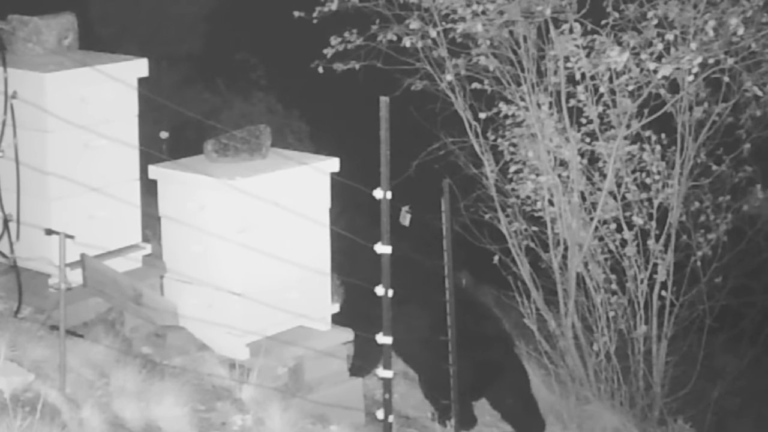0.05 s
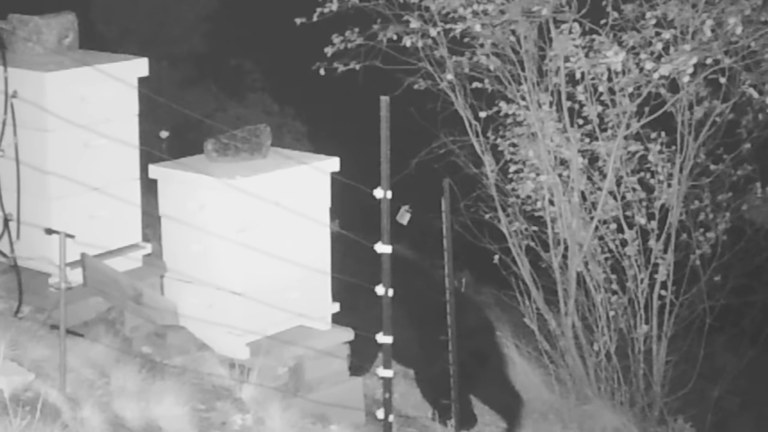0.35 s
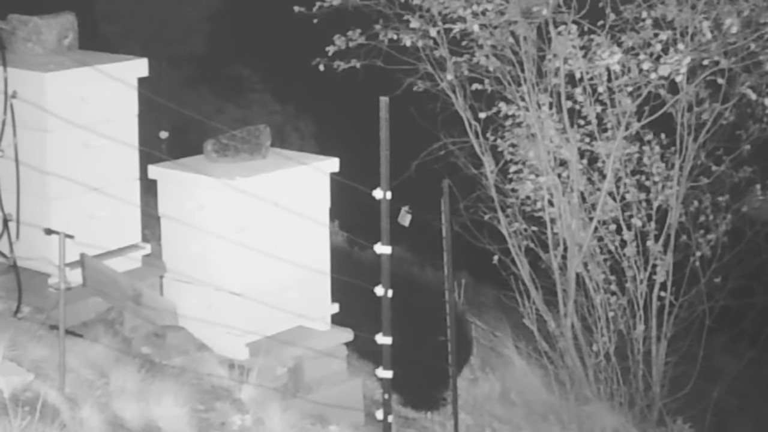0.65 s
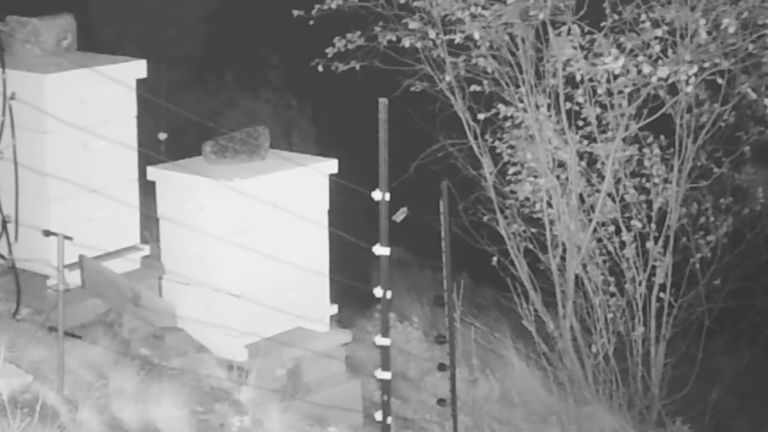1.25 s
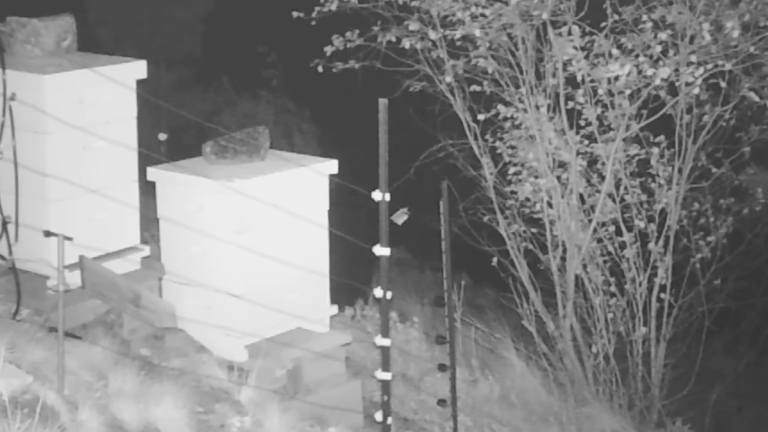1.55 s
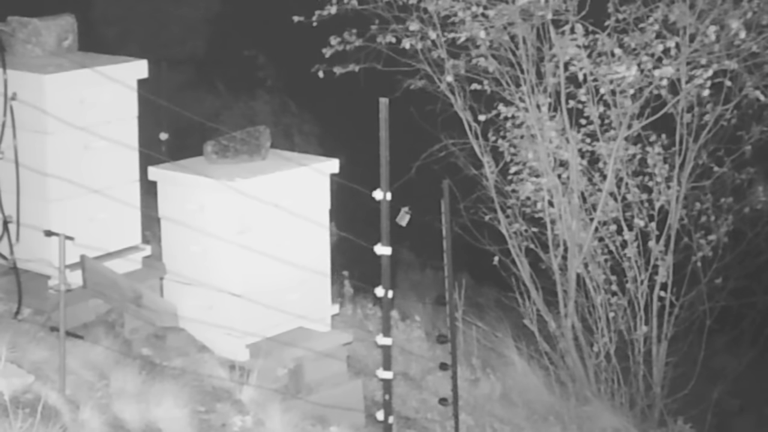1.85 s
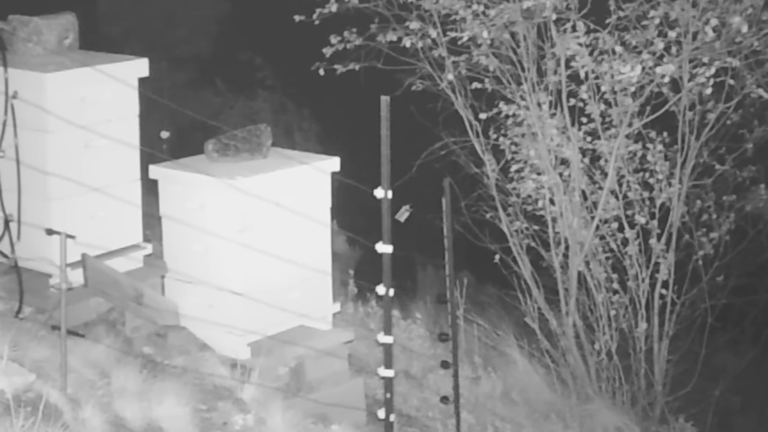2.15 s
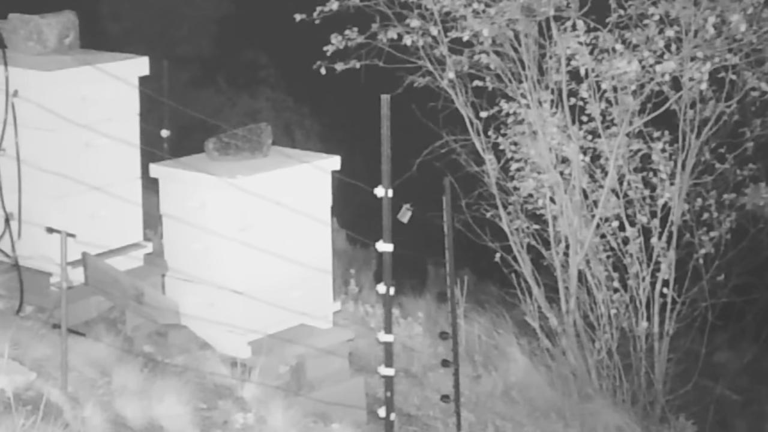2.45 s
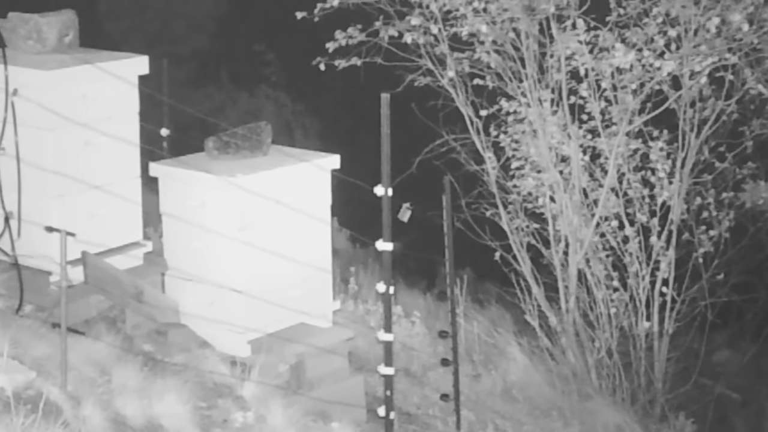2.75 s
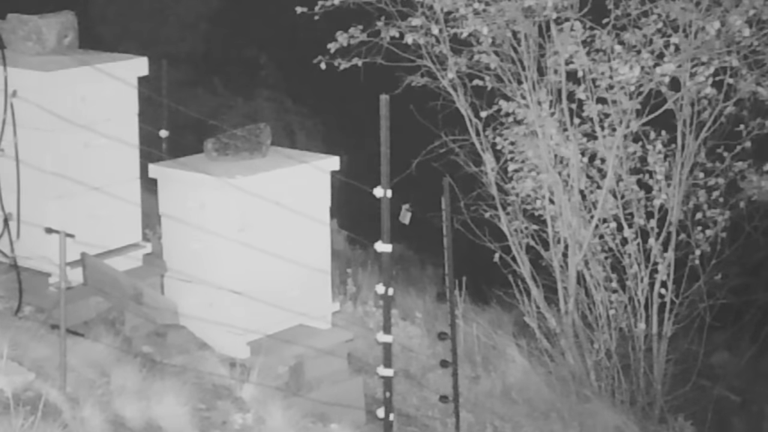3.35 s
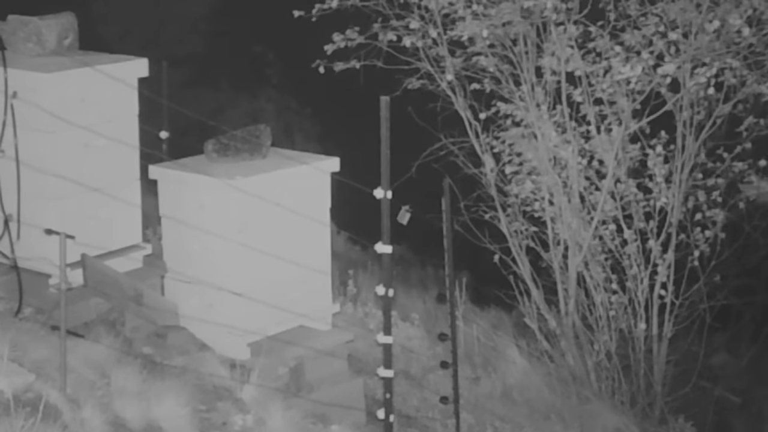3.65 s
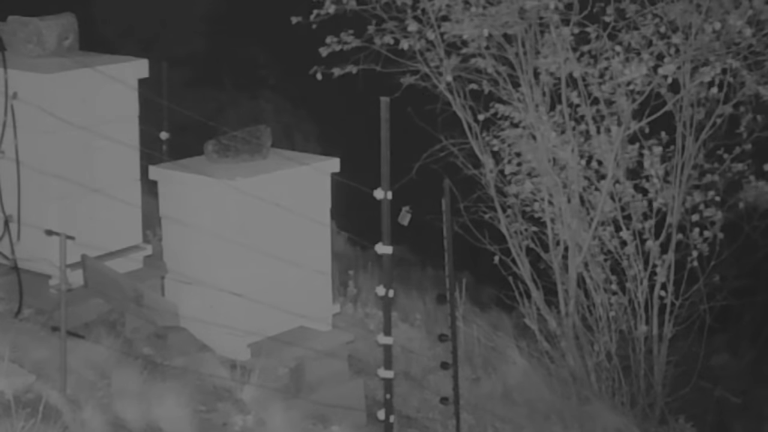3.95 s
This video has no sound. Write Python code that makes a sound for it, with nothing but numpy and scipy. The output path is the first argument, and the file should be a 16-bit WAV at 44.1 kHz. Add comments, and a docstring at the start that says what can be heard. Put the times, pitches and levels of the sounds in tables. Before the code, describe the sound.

Gusts of wind rumble and pop on the microphone outdoors, with faint rustling grass.

```python
"""Gusts of night wind rumble and pop on a microphone beside a wire fence and a bush.
The rumble comes from eddies, small swirls of air. A stronger gust reaches higher in pitch,
and the sharpest eddies pop on the microphone's opening. Behind the wind are a few twig ticks,
faint rustling grass, a steady rush of far air and the microphone's own hiss."""
import sys
import numpy as np
from scipy import signal
from scipy.fft import rfft, irfft, next_fast_len
from scipy.io import wavfile
from scipy.ndimage import uniform_filter1d, map_coordinates

SR = 44100
rng = np.random.default_rng(int(sys.argv[2]) if len(sys.argv) > 2 else 0)


def put_to_file(sound):
    """Save the sound as 16-bit audio at rate SR, in the file named by the first command-line argument."""
    columns = np.atleast_2d(sound).T  # one column per channel
    safe = np.clip(columns, -1, 1)
    whole_steps = np.round(safe * 32767)
    wavfile.write(sys.argv[1], SR, whole_steps.astype(np.int16))


N = 176400  # 4 seconds

# How strong the wind is at the microphone: time_s, level_db
GUST_STRENGTH = [(0.0, -62), (0.04, -57), (0.09, -39.5), (0.2, -60), (0.39, -62.5), (0.45, -42),
                 (0.63, -35.5), (0.76, -57), (0.78, -45), (0.87, -61.5), (0.95, -45), (1.05, -49),
                 (1.27, -42.5), (1.29, -53), (1.33, -43.5), (1.4, -61), (1.68, -59), (1.7, -46.5),
                 (1.79, -48), (1.98, -32.5), (2.04, -45), (2.06, -41.5), (2.08, -52.5), (2.11, -28.5),
                 (2.14, -44), (2.17, -31), (2.23, -46), (2.36, -39), (2.39, -49), (2.43, -42), (2.56, -52),
                 (2.7, -53), (2.74, -42), (2.87, -55), (3.04, -40.5), (3.13, -52), (3.24, -42), (3.25, -36),
                 (3.36, -36), (3.44, -67), (3.46, -43), (3.58, -64), (3.6, -44), (3.98, -40.5)]
# How strong the deep bass is: time_s, level_db
BASS_STRENGTH = [(0.0, -37), (0.11, -25.5), (0.25, -41), (0.5, -23.5), (0.89, -36), (0.93, -25.5),
                 (1.34, -29), (1.44, -47.5), (1.75, -30), (1.84, -31), (1.86, -24), (2.21, -25.5),
                 (2.24, -34), (2.26, -26), (2.36, -20), (2.39, -31), (2.53, -37.5), (2.74, -29),
                 (2.86, -35), (3.0, -26.5), (3.16, -36), (3.19, -28.5), (3.62, -27), (3.65, -33.5),
                 (3.96, -24.5), (3.98, -27)]
USUAL_GUST_DB, USUAL_BASS_DB = -42, -29.5  # the wind layers follow the distance from these levels


def wind_swell():
    """The largest eddies push slowly on the microphone and make the deepest bass."""
    # Tone of the large eddies: pitch_hz, level_db
    tone = [(8, -30), (16, 5.5), (30, 0.5), (58, -2.5), (85, -10.5), (130, -25), (300, -80.5)]
    bass_db = curve(BASS_STRENGTH) - USUAL_BASS_DB
    return gain(-27 + 1.05 * bass_db) * eddies(tone, even_s=0.1)


def wind_rumble():
    """Middle-sized eddies rumble, growing with both the gust and the deep bass."""
    # Tone of the middle-sized eddies: pitch_hz, level_db
    tone = [(40, -5.5), (75, 0.5), (105, 1.5), (185, -4.5), (260, -12.5), (400, -24.5), (800, -45),
            (2000, -96.5)]
    gust_db = curve(GUST_STRENGTH) - USUAL_GUST_DB
    bass_db = curve(BASS_STRENGTH) - USUAL_BASS_DB
    return gain(-33 + 0.77 * gust_db + 0.47 * bass_db) * eddies(tone, even_s=0.079)


def wind_flutter():
    """Small eddies come in lumps and grow fastest with the gust, so strong gusts sound brighter."""
    # Tone of the small eddies: pitch_hz, level_db
    tone = [(130, -34), (280, 4), (450, -2), (800, -11), (1300, -20.5), (2000, -32), (3500, -43.5),
            (7000, -76)]
    gust_db = curve(GUST_STRENGTH) - USUAL_GUST_DB
    lumps_db = 8 * np.tanh(wobble(points_per_s=150))
    flutter = normalize(gain(lumps_db) * eddies(tone, even_s=0.051))
    return gain(-48.5 + 1.04 * gust_db) * flutter


def wind_pops():
    """An eddy bursts on the microphone's opening: the pressure jumps, then leaks away."""
    # Bursting eddies: start_s, level_db, rise_s
    bursts = [(0.087, -31, 0.00069), (.454, -27, 0.0003), (.532, -19, .0004), (0.615, -23.5, 0.00021),
              (0.656, -21.5, 0.00036), (0.696, -24.5, 0.00063), (0.797, -29.5, 0.00053),
              (1.1813, -19, 0.00028), (1.872, -29, 0.00023), (1.954, -25, 0.00039), (2.103, -19, 0.00076),
              (2.1566, -23.5, 0.00017), (2.168, -30, 0.00029), (2.178, -24, 0.00032), (2.377, -18, 0.00072),
              (2.494, -35, 0.00047), (3.049, -21, 0.00071), (3.248, -19, 0.00047), (3.316, -24, .0006),
              (3.333, -24, .0004), (3.352, -20, 0.00055), (3.675, -27, .0003), (3.825, -23, 0.00035),
              (3.885, -23, 0.00033)]
    leak_s = 0.0041
    track, t = np.zeros(N), np.arange(SR // 20) / SR
    for start_s, level_db, rise_s in bursts:
        jump = 1 - np.exp(-(t / rise_s) ** 2)
        add(track, start_s, gain(level_db) * jump * np.exp(-t / leak_s))
    return track


def twig_ticks():
    """Twigs give short dry cracks, each a burst of noise around its own pitch."""
    # Twig cracks: start_s, level_db, pitch_hz, fade_s
    ticks = [(.596, -57, 6000, 0.0027), (.652, -59, 5800, .004), (.935, -54, 4800, 0.0037),
             (1.1096, -43.5, 3520, 0.0022), (1.584, -50, 4600, 0.0026), (1.802, -55, 6640, 0.005),
             (1.88, -53.5, 6100, 0.0047), (1.98, -56.5, 5540, .006), (2.381, -60, 4800, .012),
             (2.879, -60.5, 5500, 0.014), (3.2318, -44, 5300, 0.0021), (3.854, -52.5, 5100, 0.0063)]
    width_octaves, rise_s, top_hz = 0.59, 0.00054, 7940
    track, t = np.zeros(N), np.arange(SR // 10) / SR
    for start_s, level_db, pitch_hz, fade_s in ticks:
        band = lambda hz: 1 / (1 + (np.log2((hz + 1) / pitch_hz) / width_octaves) ** 2)
        crack = normalize(filtered(rng.standard_normal(len(t)), band))
        rise_and_fade = (1 - np.exp(-t / rise_s)) * np.exp(-t / fade_s)
        add(track, start_s, gain(level_db) * crack * rise_and_fade)
    return filtered(track, lambda hz: 1 / np.sqrt(1 + (hz / top_hz) ** 8))


def grass_rustle():
    """Grass and leaves make many tiny crinkles, their pitch shifting from leaf to leaf."""
    # How loud the rustle is: time_s, level_db
    loudness = [(0, -74), (.85, -70), (1.2, -71.5), (1.4, -69), (1.7, -69), (1.87, -66), (2.1, -69),
                (2.4, -71), (2.75, -74), (2.88, -67), (3.05, -75), (3.35, -70.5), (3.55, -88), (4, -74)]
    # Tone of the leaves: pitch_hz, level_db
    tone = [(1500, -20), (3200, -9), (4800, -1.5), (6800, -2), (8500, -13.5), (14000, -20.5)]
    crinkles_per_s, spread_db, fade_s, patch_db = 900, 1, 0.001, 2.2
    starts = rng.random(N) < crinkles_per_s / SR
    sizes = starts * gain(spread_db * np.clip(rng.standard_normal(N), -2, 2))
    fade = np.exp(-np.arange(SR // 100) / SR / fade_s)
    power = signal.fftconvolve(sizes ** 2, fade)[:N]
    crinkles = np.sqrt(np.abs(power)) * rng.standard_normal(N)
    # Lay the sound on a grid of pitch and time, then turn random patches up or down.
    grid = signal.stft(crinkles, nperseg=512)[2]
    patches = uniform_filter1d(rng.standard_normal(grid.shape), size=8, axis=0)
    patches = normalize(uniform_filter1d(patches, size=7, axis=1))
    patchy_crinkles = signal.istft(grid * gain(patch_db * patches), nperseg=512)[1][:N]
    return gain(curve(loudness)) * with_tone(patchy_crinkles, tone)


def far_rush():
    """Air moving far away makes a soft rush whose level drifts a little."""
    # Tone of the far air: pitch_hz, level_db
    tone = [(40, 12.5), (200, -1.5), (500, -0.5), (900, -4.5), (1400, -10.5), (2200, -20.5), (5000, -24)]
    return gain(-54.5 + 0.33 * wobble(points_per_s=3)) * noise(tone)


def microphone_hiss():
    """The microphone adds a faint steady hiss of its own."""
    # Tone of the hiss: pitch_hz, level_db
    tone = [(500, -3.5), (2000, -2.5), (3200, -4), (5200, -1), (6800, -6.5), (8500, -12.5), (11000, -15.5),
            (14000, -18)]
    return gain(-66) * noise(tone)


def eddies(tone, even_s):
    """Swirling air: noise with its loudness evened out over spans longer than even_s."""
    swirl = noise(tone)
    window = signal.windows.hann(int(even_s * SR) + 3)
    power = np.abs(signal.hilbert(swirl)) ** 2
    smooth_power = signal.fftconvolve(power, window / window.sum(), "same")
    return normalize(swirl / np.sqrt(np.abs(smooth_power) + 0.05))


def gain(db):
    """Turn decibels into a number to multiply by."""
    return 10 ** (np.asarray(db) / 20)


def normalize(x):
    """Scale to an average strength (rms) of 1."""
    return x / np.sqrt(np.mean(x ** 2) + 1e-20)


def curve(rows):
    """Join (time_s, value) points with straight lines, one value per sample."""
    return np.interp(np.arange(N) / SR, *np.transpose(rows))


def wobble(points_per_s):
    """A smooth curve through random points."""
    return map_coordinates(rng.standard_normal(4000), [np.arange(N) * points_per_s / SR], mode="wrap")


def filtered(x, response):
    """Multiply each pitch in x by response(hz)."""
    size = next_fast_len(len(x) + 8192)
    hz = np.fft.rfftfreq(size, 1 / SR)
    return irfft(rfft(x, size) * response(hz), size)[:len(x)]


def with_tone(x, tone):
    """Shape x by (pitch_hz, level_db) points, then scale it to strength 1."""
    pitch_hz, level_db = np.transpose(tone)
    response = lambda hz: gain(np.interp(np.log(hz + 1), np.log(pitch_hz), level_db, right=-120))
    return normalize(filtered(x, response))


def noise(tone):
    """Fresh noise with the given tone, at strength 1."""
    return with_tone(rng.standard_normal(N), tone)


def add(track, start_s, sound):
    """Mix a sound into the track at start_s."""
    part = track[int(start_s * SR):][:len(sound)]
    part += sound[:len(part)]


def scene():
    """Wind, plants and background together in one channel."""
    wind = wind_swell() + wind_rumble() + wind_flutter() + wind_pops()
    return (wind + grass_rustle() + twig_ticks() + far_rush() + microphone_hiss())[None]


def record(dry):
    """The microphone passes no steady pressure and none of the very highest pitches."""
    low_cut_hz, top_hz = 10, 14100
    response = lambda hz: (hz < top_hz) * hz / np.hypot(low_cut_hz, hz)
    return np.array([filtered(channel, response) for channel in dry])


dry = scene()
out = record(dry)
put_to_file(out)
```